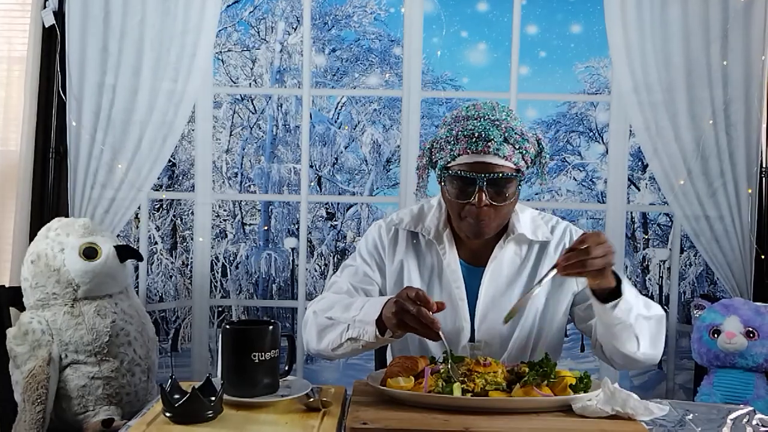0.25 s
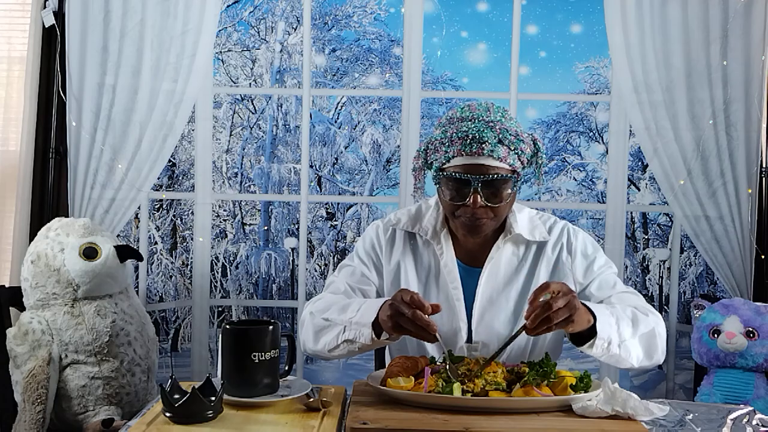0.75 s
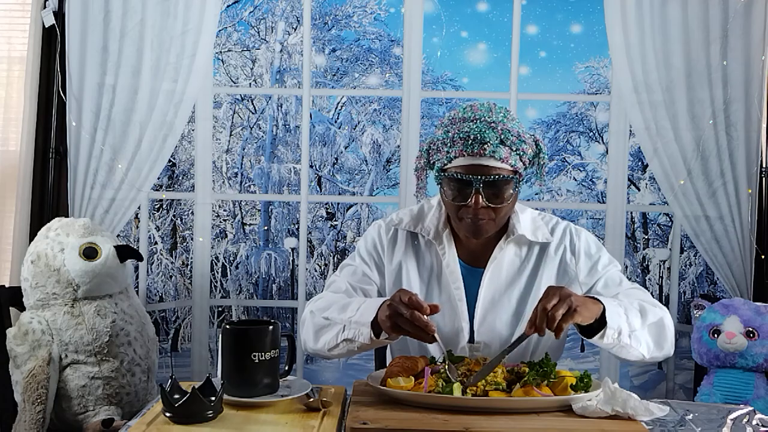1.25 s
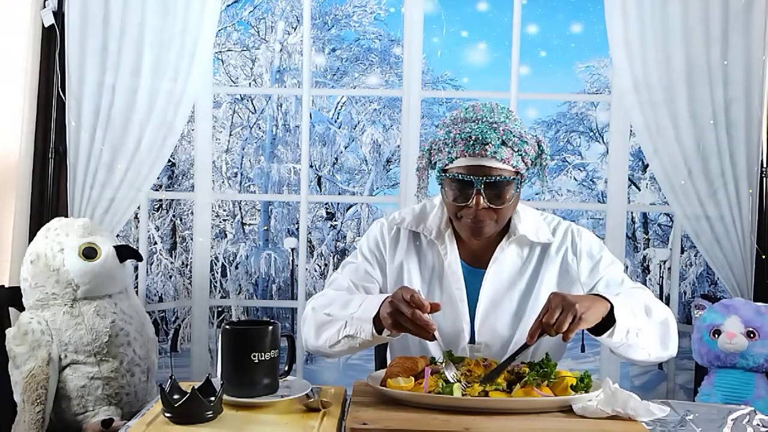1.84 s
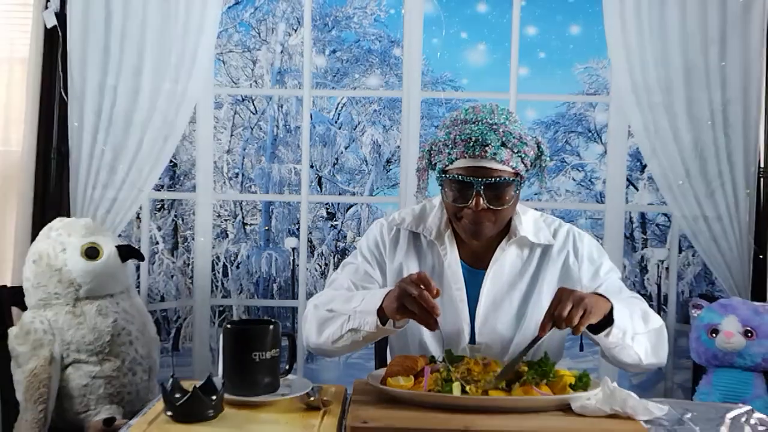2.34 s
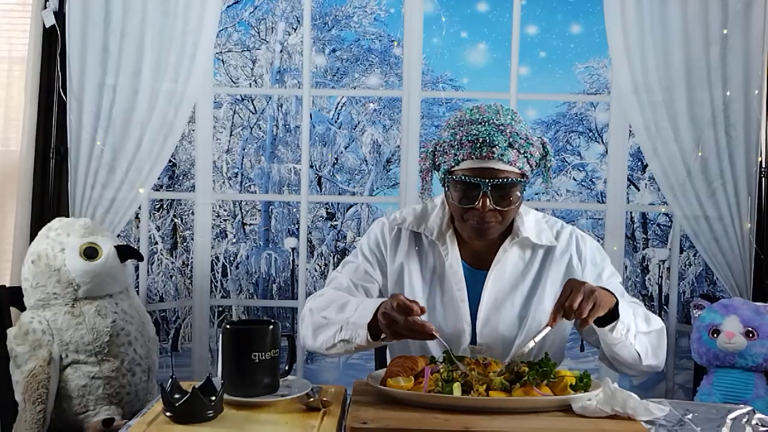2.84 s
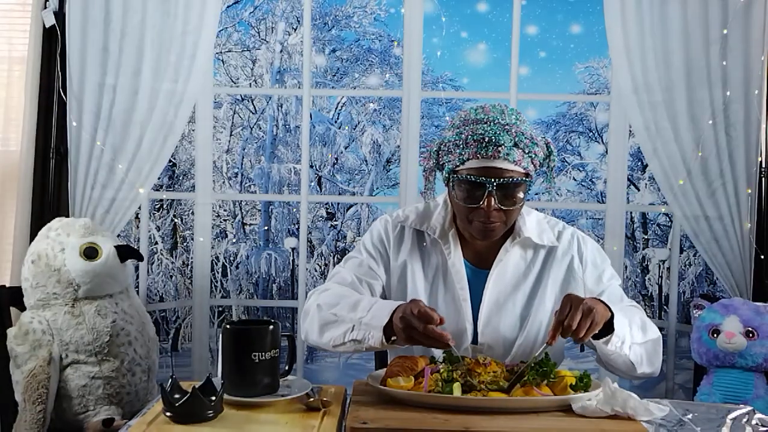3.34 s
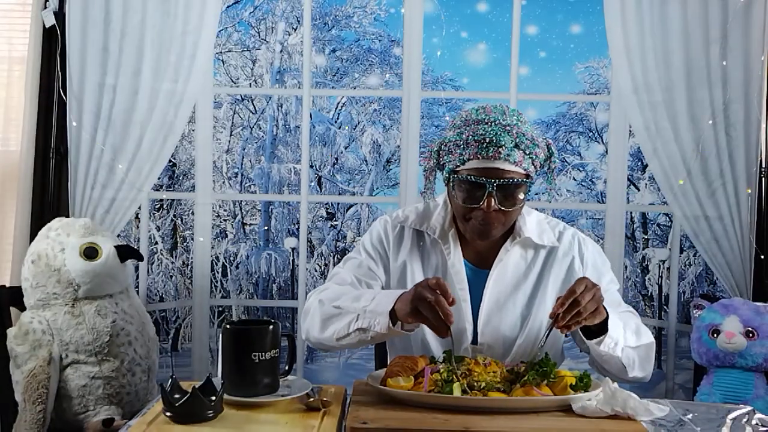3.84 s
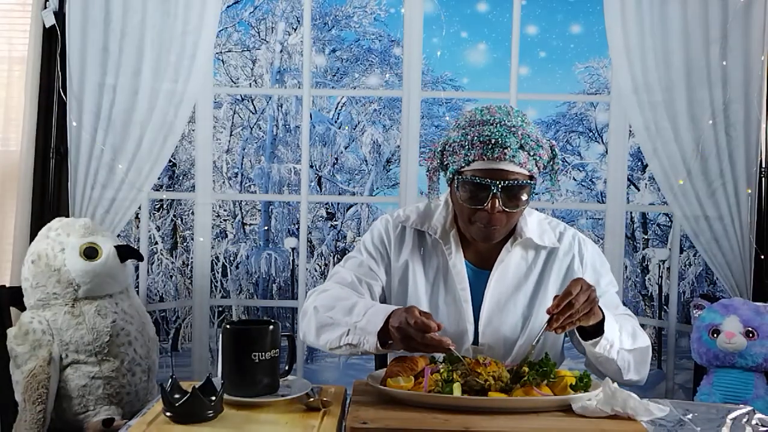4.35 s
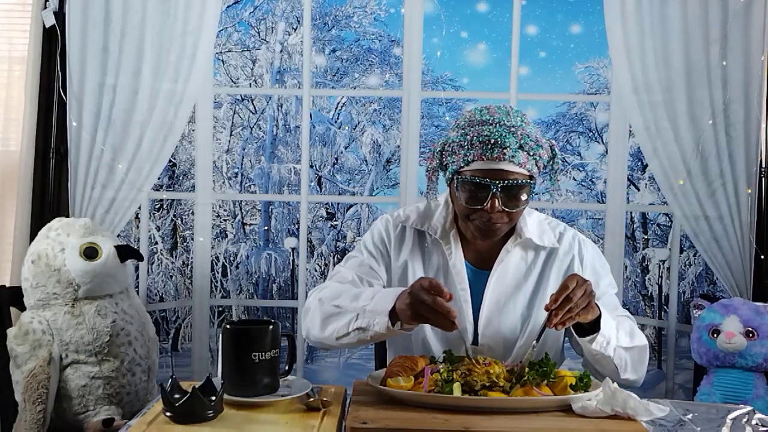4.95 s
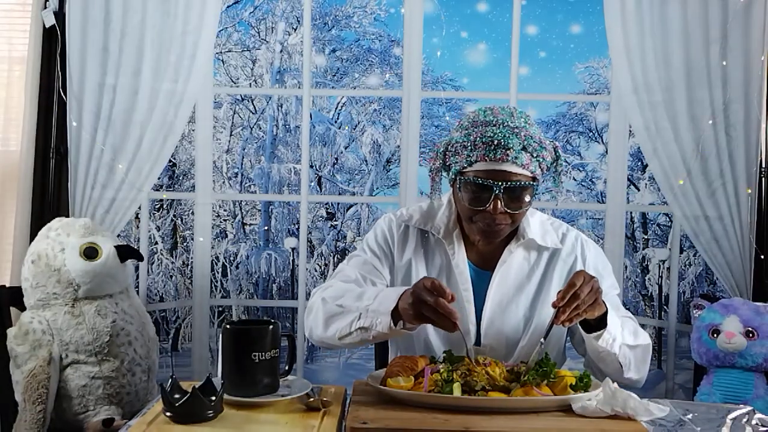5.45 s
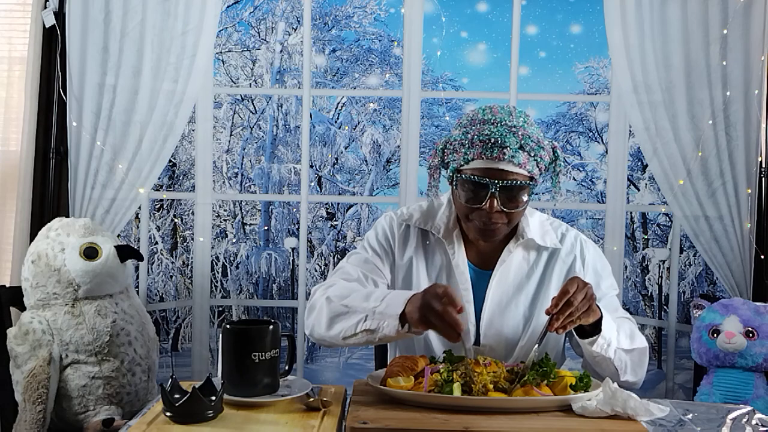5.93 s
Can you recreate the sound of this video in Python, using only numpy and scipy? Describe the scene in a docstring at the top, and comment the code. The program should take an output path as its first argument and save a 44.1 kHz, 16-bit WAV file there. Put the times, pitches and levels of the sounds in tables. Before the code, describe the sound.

Steel cutlery works through food on a china plate. Short, thin, hissy scrapes and tiny dry clicks are spaced by quiet gaps. Midway, the plate knocks hard against the table with a bright ring and rapid chatter; a softer wooden bump follows later. Short indoor reflections, a stereo microphone nearby, faint hiss and low hum underneath.

```python
"""Knife and fork on a china plate

Steel cutlery cuts food on a china plate at a wooden table in a small, quiet room.
Clicks and two hard knocks are impulses that excite damped modes of steel, china and wood.
Soft scrapes are trains of tiny slips, band-filtered and shaped by the pressure of the stroke.
Each contact gains first reflections and a diffuse tail; filtered noise gives a low rumble and faint hiss.
"""
import sys
import numpy as np
from scipy import signal
from scipy.fft import rfft, irfft, next_fast_len
from scipy.io import wavfile

SR = 44100
rng = np.random.default_rng(int(sys.argv[2]) if len(sys.argv) > 2 else 0)


def put_to_file(sound):
    """Save the sound as 16-bit audio at rate SR, in the file named by the first command-line argument."""
    columns = np.atleast_2d(sound).T  # one column per channel
    safe = np.clip(columns, -1, 1)
    whole_steps = np.round(safe * 32767)
    wavfile.write(sys.argv[1], SR, whole_steps.astype(np.int16))


N = 272934  # length of the scene in samples
SIZE = 32768  # samples in the working block of one contact
HZ = np.fft.rfftfreq(SIZE, 1 / SR)


# hard knocks on the plate: [t/s, china level/dB, table level/dB, hardness/(dB per octave),
# level of rebounds relative to the blow/dB]
PLATE_KNOCKS = [(2.5781, -29, -36.5, 1.5, -6), (4.0662, -55, -34.5, -3.5, -19)]
# modes of the china plate: [f/Hz, bandwidth/Hz, level before the hardness tilt/dB]
PLATE_MODES = [(278, 17, -6), (408.6, 18.1, -4.5), (508, 15.7, 0.5), (965, 110, -10.5), (1060, 18.4, -15.5),
               (1122, 35.4, -6), (1660, 149, -7.5), (1928, 70.6, -8), (2459, 110, -11.5), (2690, 35, -7.5),
               (2796, 66, -7), (2810, 29, -6), (3025, 29.15, -1), (3057, 56, -3), (3200, 40, -1.5),
               (3324, 160, -10), (3560, 8, -8.5), (3700, 6, -2), (3745, 44, -3), (4120, 170, -21),
               (4350, 128, -14.5), (4696, 77, -16), (5594, 150, -26.5), (6096, 72, -22), (6550, 280, -17.5),
               (7116, 110, -15), (7724, 286, -25), (9517, 365, -18.5), (11030, 299, -25.5),
               (13480, 299, -31.5)]
# modes of the wooden table: [f/Hz, bandwidth/Hz, level before the hardness tilt/dB]
TABLE_MODES = [(272, 15.1, -16.5), (397, 33, -28.5), (510, 22.3, -13), (801, 48, -0.8), (1098.4, 29, 4),
               (1369, 62.7, 2.5), (1590, 80.5, 0.3), (1800, 88, 2.5), (2249, 240, -0.1), (2518, 27, 5.5),
               (2970, 176, 3), (3760, 110, -2.7), (4160, 341, -8.5), (5170, 282, -8.5), (5945, 150, -3),
               (7370, 190, -16.5), (10030, 213, -22.5)]
# chatter of the plate: first gap, growth of each further gap, extra loss of a rebound into the table
CHATTER_S, CHATTER_GROWS_S, CHATTER_THUD_DB = 0.0046, 0.0024, -5.5
KNOCK_CRACK_DB = -21  # crack relative to the china


def knocks(linger=0.98, count=4):
    """Impact and rebound: a blow rings the china, thuds into the table, and chatters as the plate settles."""
    out = np.zeros((2, N))
    delays = np.cumsum(CHATTER_S + CHATTER_GROWS_S * np.arange(count - 1))
    for s, ring_db, thud_db, hardness_db, rebound_db in PLATE_KNOCKS:
        impacts = [(s, ring_db, thud_db)]
        for delay in delays:
            impacts.append((s + delay, ring_db + rebound_db, thud_db + rebound_db + CHATTER_THUD_DB))
        for at, china_db, wood_db in impacts:
            china = amp(china_db) * struck(PLATE_MODES, hardness_db)
            wood = amp(wood_db) * struck(TABLE_MODES, hardness_db)
            blow = china + wood + amp(china_db + KNOCK_CRACK_DB) * crack()
            # the shaken table keeps the tail going longer than after a click
            add(out, at, in_room(blow, echo_db=4.5, linger=linger))
    return out


# light clicks; the spot hit makes one mode ring out: [t/s, knife level/dB, fork level/dB,
# ring level/dB, ring f/Hz, hardness/(dB per octave), left minus right level/dB]
CUTLERY_CLICKS = [(0.9998, -63.5, -53.5, -61.5, 2746, 0, 1), (1.87, -66.5, -58, -74, 7600, 4.5, 0),
                  (2.0236, -46.5, -50, -47.5, 6970, 4.5, 2), (2.0286, -49.5, -43.5, -61.5, 5870, -3.6, 2),
                  (2.2043, -62.5, -62.5, -65, 3960, 4, -1), (3.9862, -65.5, -96, -72, 2670, -0.2, 3),
                  (4.278, -63.5, -66, -66.5, 3080, -5, 0.5), (5.2090, -54, -63, -67, 8870, -2.4, 1),
                  (5.885, -48.5, -56.5, -61, 2630, -1.5, 1)]
# modes of the knife: [f/Hz, bandwidth/Hz, level before the hardness tilt/dB]
KNIFE_MODES = [(1743, 94, 0), (1920, 68, 5.5), (2570, 45, -8.5), (2934, 83, -9.5), (3717, 70, -8),
               (5680, 960, -12), (7030, 300, -4), (8540, 300, -12.5), (9030, 100, -11.5), (10900, 610, -18),
               (12600, 510, -37), (14100, 460, -23)]
# modes of the fork: [f/Hz, bandwidth/Hz, level before the hardness tilt/dB]
FORK_MODES = [(2380, 160, 4), (2710, 270, -11.5), (3960, 190, 1), (5650, 1100, 1), (5920, 550, -3.5),
              (6640, 97, -7), (7420, 590, 7), (9260, 200, 8.5), (10000, 350, 11), (11010, 190, 14.5),
              (11880, 590, 9), (13400, 270, 9.5)]
RING_WIDTH_HZ = 76
CLICK_CRACK_DB = -11  # crack relative to knife and fork together


def clicks():
    """Damped modal vibration: taps excite the steel, which hand and food damp within milliseconds."""
    out = np.zeros((2, N))
    for s, knife_db, fork_db, ring_db, ring_hz, hardness_db, pan_db in CUTLERY_CLICKS:
        knife = amp(knife_db) * struck(KNIFE_MODES, hardness_db)
        fork = amp(fork_db) * struck(FORK_MODES, hardness_db)
        ring = amp(ring_db) * struck([(ring_hz, RING_WIDTH_HZ, 0)], hardness_db)
        crack_gain = amp(CLICK_CRACK_DB) * np.hypot(amp(knife_db), amp(fork_db))
        tap = knife + fork + ring + crack_gain * crack()
        pan = amp([[pan_db / 2], [-pan_db / 2]])
        add(out, s, in_room(tap, echo_db=6, linger=0.88) * pan)
    return out


# scrapes of steel on the plate, levels before the pressure envelope:
# [t/s, duration/s, steel hiss level/dB, hiss centre f/Hz, china rasp level/dB]
PLATE_SCRAPES = [(0.772, 0.037, -83, 7300, -73.5), (0.909, 0.029, -68.5, 9200, -79),
                 (0.962, 0.083, -68.5, 7500, -77), (1.471, .015, -85, 8500, -74.5),
                 (1.52, .028, -68, 8800, -63), (1.805, 0.14, -79.5, 8900, -93),
                 (2.156, 0.049, -69, 10700, -95), (3.332, 0.051, -74.5, 7460, -95),
                 (3.599, 0.022, -72.5, 7400, -91), (6.043, 0.05, -74.5, 4950, -84.5)]
# width of the steel's hiss; centre and width of the china's rasp
STEEL_OCTAVES, CHINA_HZ, CHINA_OCTAVES = 0.28, 2680, 0.23
# soft drag through the food: lead before the scrape, duration, peak pressure relative to the scrape
DRAG_LEAD_S, DRAG_S, DRAG_DB = 0.12, 0.3, -22.5
# brief catches: largest offset from the scrape's start, duration, peak pressure relative to the scrape
CATCH_WITHIN_S, CATCH_S, CATCH_DB = 0.055, 0.009, -10


def scrapes(count=3):
    """Friction under varying pressure: the blade drags through food, catches and bites on the china."""
    out = np.zeros((2, N))
    for s, length, steel_db, centre_hz, china_db in PLATE_SCRAPES:
        offsets = CATCH_WITHIN_S * rng.uniform(-0.92, 1, count)
        catches = sum(swell(DRAG_LEAD_S + offset, CATCH_S) for offset in offsets)
        drag = swell(0, DRAG_S)
        bite = swell(DRAG_LEAD_S, length)
        pressure = bite + amp(DRAG_DB) * drag + amp(CATCH_DB) * catches
        hiss = amp(steel_db) * rubbing(centre_hz, STEEL_OCTAVES)
        rasp = amp(china_db) * rubbing(CHINA_HZ, CHINA_OCTAVES)
        add(out, s - DRAG_LEAD_S, in_room(rfft(pressure * (hiss + rasp)), echo_db=-3.0))
    return out


def rubbing(centre_hz, octaves, slips_per_s=900, scatter_db=5):
    """Stick-slip friction: uneven random slips over steady noise, coloured by a resonant band; rms 1."""
    slips = (rng.random(SIZE) < slips_per_s / SR) * amp(scatter_db * rng.standard_normal(SIZE))
    signed_slips = unit(slips * rng.choice([-1, 1], SIZE))
    rub = signed_slips + 0.5 * rng.standard_normal(SIZE)

    def band(hz):
        return 1 / (1 + (np.log2((hz + 1) / centre_hz) / octaves) ** 2)
    return unit(filtered(rub, band))


def swell(start, length, skew=0.75):
    """Amplitude envelope: pressure rises quickly and eases off over the given seconds."""
    progress = np.clip((np.arange(SIZE) / SR - start) / length, 0, 1)
    return np.sin(np.pi * progress ** skew)


CRACK_S, CRACK_HZ = 0.0013, 7000  # amplitude time constant; corner of the high-pass


def crack():
    """Broadband transient: decaying, high-passed noise at the instant of contact, rms 1 over 10 ms."""
    burst = rng.standard_normal(SIZE) * np.exp(-np.arange(SIZE) / SR / CRACK_S)
    high_pass = (1j * HZ / (CRACK_HZ + 1j * HZ)) ** 2
    return over_10_ms(rfft(burst) * high_pass)


def struck(modes, hardness_db):
    """Impulse excitation: a harder contact favours the high modes of a body; rms 1 over 10 ms."""
    return over_10_ms(resonances(modes, HZ, hardness_db))


def over_10_ms(spectrum):
    """Energy normalisation: scale to the energy of a 10 ms sound with rms 1."""
    return spectrum * np.sqrt(SR / 100 / np.sum(irfft(spectrum) ** 2))


def resonances(modes, hz, tilt_db=0, swell_hz=500, spread=0.001639):
    """Modal superposition: damped modes, tilted per octave, swell quickly and start up to spread s apart."""
    f, w, db = np.transpose(modes)[:, :, None]
    onset = np.exp(-2j * np.pi * hz * spread * rng.random(f.shape))
    gain = amp(db + tilt_db * np.log2(f)) * onset
    resonance = hz * w / (f * f - hz * hz + 1j * hz * w)
    build_up = 1 / (1 + 1j * (hz - f) / swell_hz)
    return np.sum(gain * resonance * build_up, axis=0)


# reverberation, scaled by linger at each contact: [f/Hz, t60/s]
REVERB_DECAY = [(250, 0.37), (500, 0.34), (800, 0.36), (1100, 0.42), (1500, 0.3027), (3000, 0.33),
                (7000, 0.3233), (10000, 0.21), (14000, 0.3)]
# interchannel likeness of the tail: [f/Hz, correlation (no unit)]
TAIL_LIKENESS = [(250, 0.25), (1000, 0.35), (3000, 0.427), (7000, 0.094), (14000, .1)]
# first reflections, before a slight random shift per channel: [delay/s, level/dB]
FIRST_REFLECTIONS = [(.0045, -18), (0.0117, -16), (0.0189, -3.5)]


def in_room(spectrum, echo_db, linger=1, build=0.0012):
    """Room impulse response: direct sound, reflections off the nearest walls, then a diffuse tail."""
    hz, t, z = signal.stft(stereo_noise(TAIL_LIKENESS, SIZE), SR, nperseg=256)
    decay = amp(-60 * t / linger / along(REVERB_DECAY, hz)[:, None])
    tail = signal.istft(z * decay, SR, nperseg=256)[1][:, :SIZE]
    tail = tail * (1 - np.exp(-np.arange(SIZE) / SR / build))
    tail = tail / np.sqrt(np.sum(tail ** 2) / 2)  # mean energy 1 per channel
    walls = 0
    for s, db in FIRST_REFLECTIONS:
        delay = abs(s + rng.normal(0, 0.0001, (2, 1)))
        walls = walls + amp(db) * np.exp(-2j * np.pi * HZ * delay)
    response = 1 + walls + amp(echo_db) * rfft(tail)
    return irfft(spectrum * response)[:, :SIZE // 2]


# spectrum of the still air before scaling to rms 1: [f/Hz, relative level per Hz/dB]
AIR_SPECTRUM = [(12, -38.5), (20, -7), (71, -1), (200, -11.5), (229, -10), (294, -12), (337, -12.5),
                (386, -16), (468, -11), (508, -18), (706, -13.5), (766, -20), (980, -18), (2170, -26),
                (14000, -46.5)]
# interchannel likeness of the background: [f/Hz, correlation (no unit)]
AIR_LIKENESS = [(60, 0.98), (150, 0.87), (380, 0.45), (950, 0.02994), (2380, 0.027), (5980, 0.0598),
                (15000, 0.024)]
# low resonances of the room, before scaling to rms 1: [f/Hz, bandwidth/Hz, relative level/dB]
ROOM_MODES = [(75, 4.6, -7), (110.1, 7.7, -8), (177, 14, 2), (226.2, 11, -8), (274.4, 9.7, -4.5),
              (580, 49, -4), (990, 27, -4.5)]


def room_air(air_db=-62, drone_db=-72):
    """Stationary filtered noise: steady rumble and hiss, with the room's low resonances humming."""
    air = unit(filtered(stereo_noise(AIR_LIKENESS, N), lambda hz: amp(along(AIR_SPECTRUM, hz))))
    drone = unit(filtered(stereo_noise(AIR_LIKENESS, N), lambda hz: resonances(ROOM_MODES, hz)))
    return amp(air_db) * air + amp(drone_db) * drone


def stereo_noise(alike, size):
    """Partial coherence: mixing mid and side white noise sets how alike the two channels are."""
    def mid_side(hz):
        angle = np.arccos(np.clip(along(alike, hz), -1, 1)) / 2
        return np.array([np.cos(angle), np.sin(angle)])
    mid, side = filtered(rng.standard_normal((2, size)), mid_side)
    return np.array([mid + side, mid - side])


def filtered(x, response):
    """Linear filtering: multiply the spectrum of x by a response of frequency, with zero padding."""
    n = x.shape[-1]
    m = next_fast_len(n + SIZE // 4)
    return irfft(rfft(x, m) * response(np.fft.rfftfreq(m, 1 / SR)), m)[..., :n]


def along(points, hz):
    """Logarithmic frequency scale: interpolate (f/Hz, value) points."""
    f, v = np.transpose(points)
    return np.interp(np.log(hz + 1), np.log(f + 1), v)


def amp(db):
    """Level law: decibels to amplitude gain."""
    return 10 ** (np.asarray(db) / 20)


def unit(x):
    """Power normalisation: scale to rms 1."""
    return x / np.sqrt(np.mean(x ** 2) + 1e-20)


def add(track, s, sound):
    """Superposition: mix a stereo sound into the track at s seconds."""
    part = track[:, max(round(s * SR), 0):][:, :sound.shape[1]]
    part += sound[:, :part.shape[1]]


def scene():
    """Superposition of cutlery and plate with the quiet room."""
    return knocks() + clicks() + scrapes() + room_air()


EDGE_HZ, TOP_HZ = 14500, 16500  # corner of the roll-off; absolute band limit


def record(dry):
    """Band limitation: the recorder rolls off steeply and keeps nothing above its limit."""
    return filtered(dry, lambda hz: (hz < TOP_HZ) / np.sqrt(1 + (hz / EDGE_HZ) ** 80))


dry = scene()
out = record(dry)
put_to_file(out)
```